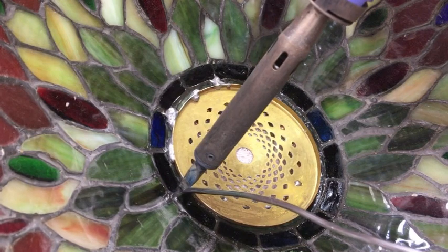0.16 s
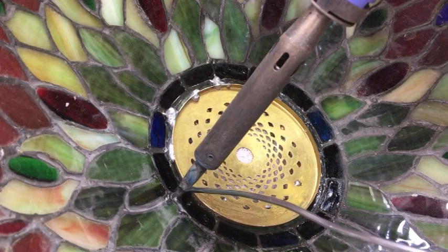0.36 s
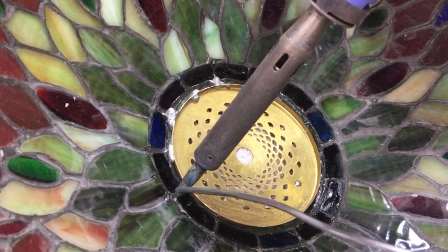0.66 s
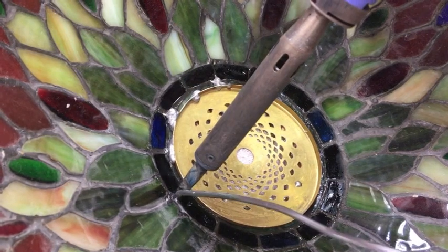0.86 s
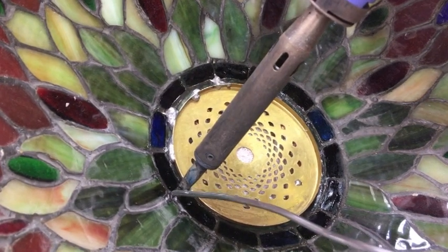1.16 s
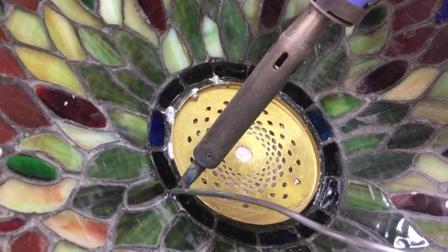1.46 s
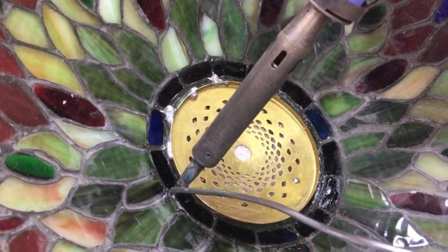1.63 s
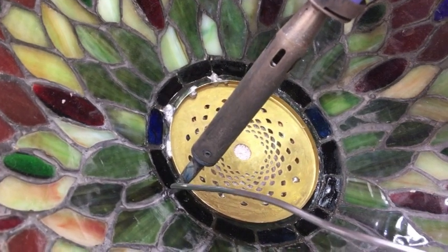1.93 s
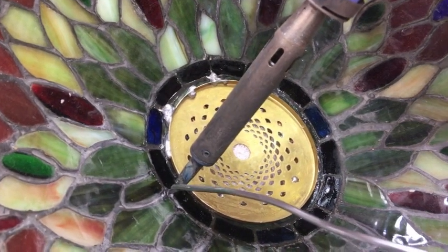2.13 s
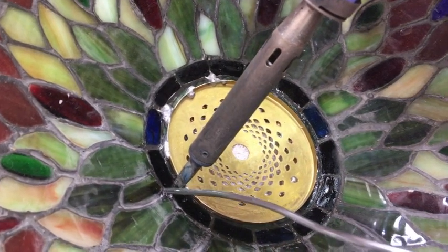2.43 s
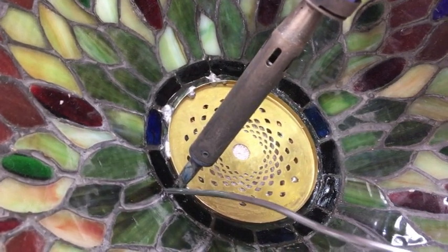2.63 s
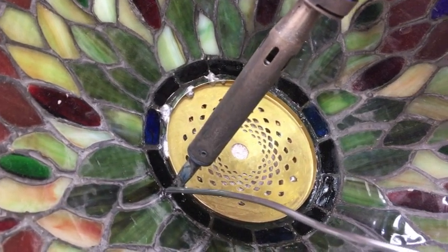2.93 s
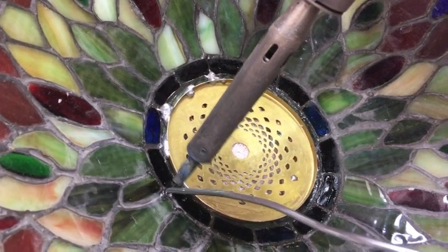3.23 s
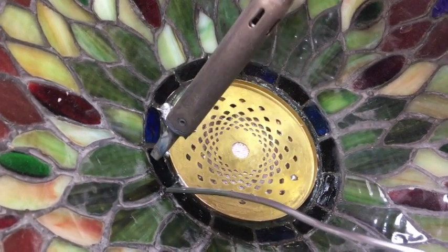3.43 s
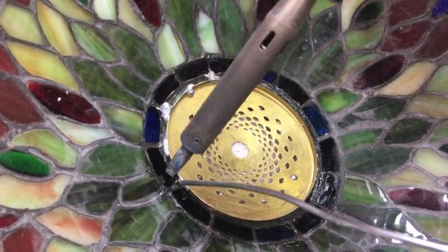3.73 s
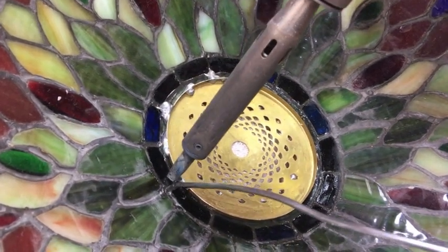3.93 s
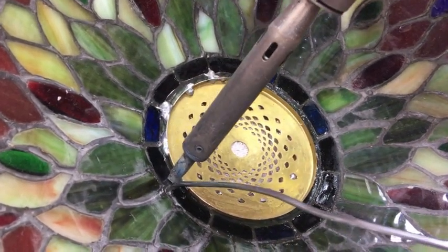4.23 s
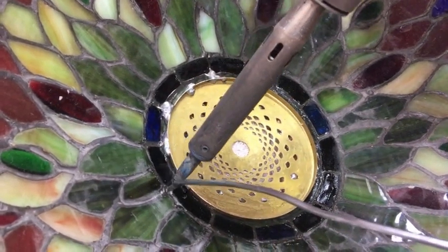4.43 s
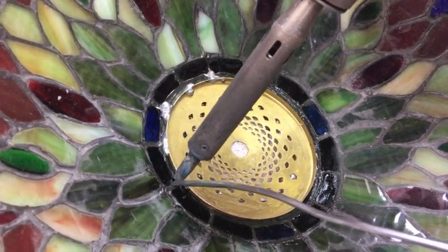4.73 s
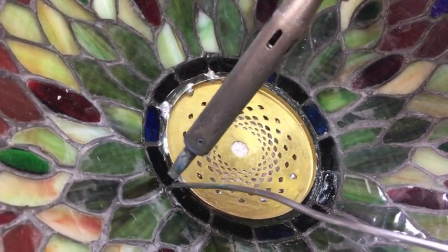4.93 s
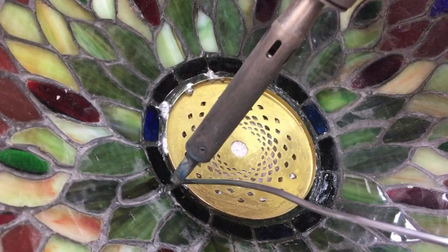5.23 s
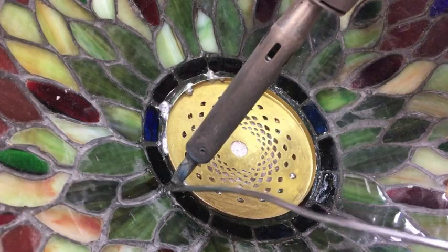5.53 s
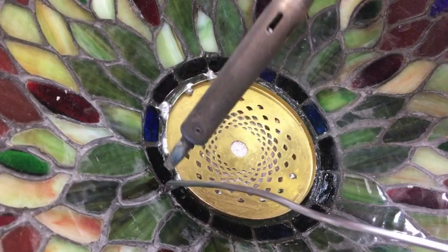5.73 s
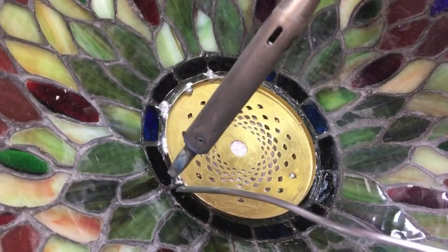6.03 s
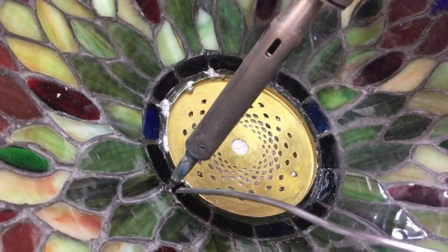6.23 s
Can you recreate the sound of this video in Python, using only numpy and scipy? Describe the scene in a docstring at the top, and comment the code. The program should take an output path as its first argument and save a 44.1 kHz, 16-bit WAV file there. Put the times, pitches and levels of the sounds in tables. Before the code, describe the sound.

Close up in a quiet, fairly dry workshop, a faint touch on glass leads into bright, dense flares of sizzling flux. They sink to a simmering crackle full of sharp spits, which fades after three seconds. One more short sizzle comes around four, then mostly hush, with knocks and tiny ticks of iron and wire on the shade. Low room rumble, faint hiss and a far engine continue throughout.

```python
"""Flux boils where a hot iron melts cored solder between a brass cap and a stained-glass shade.
First comes a soft knock, then bright flares of fizz: dense random noise bursts, coloured by resonances.
They thin to a crackle with sharp spits (clicks with noise tails), over a few dull band-passed thuds.
Later iron and wire knock and tick on the shade (filtered pulses, short rings) and the fizz nearly dries up.
Throughout, noise makes room rumble and hiss; a far engine, a few harmonics, slows and then picks up."""
import sys
import numpy as np
from scipy import signal
from scipy.fft import rfft, irfft
from scipy.io import wavfile
from scipy.ndimage import uniform_filter1d

SR = 44100
rng = np.random.default_rng(int(sys.argv[2]) if len(sys.argv) > 2 else 0)


def output_pcm(signal):
    """Save a mono or channel-first signal as 16-bit PCM at the path in sys.argv[1].

    Samples are clipped to [-1, 1] before scaling.
    """
    pcm = np.clip(np.atleast_2d(signal).T, -1, 1) * 32767
    wavfile.write(sys.argv[1], SR, np.round(pcm).astype(np.int16))


N = 281049

# Table levels are relative where a function adds its own trim.
# Flares of fizz and brief sputtering bursts: start_s, fizz_db, attack_s, hold_s, release_db_per_s
FLARES = [(0.208, -31, 0.004, 0.02, 250), (0.261, -30, 0.021, 0.092, 140), (0.343, -28.5, 0.052, 0.059, 87),
          (0.509, -31.5, 0.057, 0.12, 51), (1.102, -40.5, .03, 0.076, 130), (1.366, -38.5, 0.017, .04, 127),
          (1.62, -40.5, 0.019, 0.12, 150), (3.356, -47, 0.0068, 0.014, 350),
          (3.411, -47.5, .005, 0.014, 400), (3.86, -57, 0.017, 0.019, 175.5), (3.962, -63, .01, 0.019, 500),
          (4.028, -35, 0.044, 0.33, 126), (4.671, -63, .03, 0.08, 110), (5.331, -44.5, 0.0028, 0.29, 800),
          (6.27, -52.5, 0.0052, .1, 145)]
FLARE_SAG_DB_PER_S = 8  # from the onset; the release adds to it
# The pool at the opening, one row: time_s, fizz_db, bubble_ring_db
OPENING = (0.34, -41.5, -59.5)
# The pool simmers on between the flares: time_s, fizz_db, bubble_ring_db
SIMMER = [(0.76, -42.5, -52.5), (0.88, -42.5, -56.5), (1.16, -42.5, -55.5), (1.28, -45, -56),
          (1.57, -42.5, -56), (1.72, -45.5, -58.5), (1.98, -49, -59), (2.13, -47.5, -57),
          (2.35, -48.5, -56.5), (2.54, -47, -53), (2.7, -46, -57), (2.84, -47.5, -49), (2.98, -46, -53.5),
          (3.14, -51, -56.5), (3.3, -52, -62), (3.38, -57, -62.5), (3.51, -61, -72.5), (3.8, -69, -73.5)]
# The remnant of the pool: time_s, fizz_db, bubble_ring_db
LAST_SIMMER = [(4.46, -68, -77), (4.552, -59.5, -72.5), (4.774, -65.5, -69), (4.958, -71, -77.5),
               (5.128, -74, -81.5), (5.3, -78, -85)]
FRESH_FOR_S = 2.7  # the pool on the joint takes this long to become spent
DRY_AT_S, DRYING_DB_PER_S = 4.8, 3.5  # the remnant boils away
FLARE_RING_DB = -16.5  # bubble ring of a flare or burst, re its fizz
# Countless tiny bubbles of fresh flux, one row: bursts_per_s, lower_hiss_db (re fizz)
FRESH = (7400, -15.5)
# Fewer, larger bubbles of spent flux, one row: bursts_per_s, lower_hiss_db (re fizz)
SPENT = (480, -9)
# Colour of a bursting bubble: frequency_hz, level_db
FIZZ = [(400, -27), (800, -24), (1500, -21.5), (2600, -15.5), (4400, -20.5), (5500, -14), (6500, -23.5),
        (8200, -7), (10000, -12), (12000, -5.5), (14300, 0.5), (16000, -1)]
# Resonances of the cap, the glass and the gap under the iron: frequency_hz, boost_db
GAP = [(1620, 8.5), (2330, 8.5), (2900, 11.5), (3330, 9), (3750, 7.5), (4180, 12), (4600, 11), (5300, 8.5),
       (6380, 16.5), (7400, 17), (8850, 8), (9480, 13.5), (10100, 12), (10690, 10), (11280, 9.5),
       (11660, 7.5), (12030, -6), (12340, 11.5), (12740, 2.5), (13090, 0), (14150, 6), (14500, -1.5),
       (14900, 6.5)]
GAP_WIDTH_HZ = 153  # where the boost in dB has halved
# Ring of the larger bubbles: frequency_hz, level_db
BUBBLE = [(3000, -31), (5600, -14), (6200, 0.5), (6900, -1), (7450, 0), (8100, -10), (9000, -6.5),
          (10500, -13), (16000, -40.5)]
# The loudest spits of flux: start_s, crack_peak_db, sputter_db
SPITS = [(0.2039, -18, -26), (1.1358, -22, -32), (1.1852, -25, -35), (1.3379, -28, -37), (1.3678, -24, -35),
         (1.503, -24, -35), (1.5464, -26, -34), (1.5898, -25, -33), (1.722, -24, -32), (1.9355, -27, -37),
         (2.0004, -31, -40), (2.0288, -30, -38), (2.0971, -30, -40), (2.1774, -32, -39), (2.3311, -25, -41),
         (2.4309, -29, -39), (2.4997, -25, -39), (2.5925, -21, -35), (2.6873, -24, -39), (2.7926, -23, -37),
         (2.8145, -24, -40), (2.9143, -23, -39), (2.9846, -24, -37), (3.0435, -28, -43), (3.1253, -28, -40),
         (3.1587, -26, -39), (3.2475, -30, -43), (3.3019, -31, -42), (3.3643, -34, -42), (3.4181, -33, -45),
         (3.4805, -32, -43), (3.5124, -34, -45), (4.9092, -31, -43), (4.9521, -49, -59), (5.0095, -47, -58),
         (5.0744, -48, -59)]
SPIT_S, SPIT_RISE_S = .0027, .0005  # decay of a sharp spit and opening of any spit, time constants
SHARP_CREST_DB, SOFTER_DB_PER_DOUBLING = 12.5, 10  # a spit whose crack stands out less sputters longer
# Small spits fall at random; their crack is set re the simmer
SMALL_SPITS_PER_S, SMALL_SPIT_DB, SMALL_SPIT_S = 14, 7, .0025
SMALL_CREST_DB = 8.5  # a small spit's crack over its sputter, before trims
# Iron and wire knock on the shade: start_s, peak_db, lowest_hz, contact_cut_hz, scuff_s
KNOCKS = [(0.141, -54.5, 393, 1200, 0.006), (0.172, -53.5, 500, 1400, 0.0035),
          (3.286, -49.5, 550, 1410, 0.011), (3.764, -57, 1205, 1500, 0.0018),
          (4.056, -38, 279, 2200, 0.0071), (4.232, -50, 698, 1297, 0.015), (4.352, -46.5, 302, 1800, 0.037),
          (4.436, -31, 1400, 1760, 0.0019), (5.3342, -19, 109, 8900, .0001),
          (5.973, -56, 1200, 1518, 0.0016), (6.092, -56.5, 1600, 2070, 0.002),
          (6.279, -25, 99, 1670, 0.0001)]
# Response of the glass shade to a tap: frequency_hz, level_db
SHADE = [(60, -3.5), (170, 1.5), (250, -2.5), (355, 3.5), (470, -6), (600, -15.5), (760, -3), (1000, -15),
         (1220, -7.5), (1550, -22.5), (2100, -24), (2900, -20), (4500, -37.5), (9000, -23.5), (16000, -40)]
# Its longer ringing modes: frequency_hz, level_db, t60_s
SHADE_MODES = [(345, -44, 0.2), (710, -48, 0.092), (1264, -40, 0.039)]
# Light ticks of the solder wire: start_s, peak_db, pitch_hz
TICKS = [(5.189, -52.5, 2100), (5.19, -53, 4000), (5.748, -49, 5700), (2, -55, 3700)]
# Soft low bumps as the hand shifts: start_s, level_db
BUMPS = [(0.495, -46.5), (0.508, -56), (0.573, -55.5), (0.614, -54), (0.65, -51), (0.711, -50),
         (.73, -51.5), (0.78, -47.5), (.868, -47), (0.911, -50)]
START_HZ, IDLE_HZ, COAST_S = 52, 37.33, 1.17  # the engine's firing rate coasts down towards idle
PULL_AT_S, PULL_HZ_PER_S = 2.75, 8.8  # then rises evenly
# Loudness of the far engine: time_s, level_db
ENGINE_LEVEL = [(0, -54), (.7, -49.5), (1.2, -56.5), (2.4, -54), (2.8, -56.5), (4.0, -65.5), (5.2, -57.5),
                (6.37, -52)]
# Response of the walls and the room to it: frequency_hz, level_db
WALLS = [(40, -18), (50, -12), (60, 2), (70, -2.5), (79, -4), (86, -3.5), (95, 1), (104, 0), (122, -1.5),
         (136, -8), (180, 2.5), (220, -12)]
# Spectrum of the workshop rumble: frequency_hz, level_db
ROOM = [(15, -44), (25, -13.5), (40, -3), (62, 3), (95, -4.5), (130, -8), (210, -11), (300, -19),
        (420, -25.5), (700, -33.5), (1150, -29), (1500, -44), (3000, -68)]
# Spectrum of the faint hiss: frequency_hz, level_db
HISS = [(300, -18), (1200, -4), (2500, -4), (5000, -9), (10000, -7), (16000, -4.5)]
RUMBLE_DB, HISS_DB = -57, -70.5  # rms
CUTOFF_HZ = 15850


def flares():
    """Superposition of powers: each flare or burst swells, holds with a slight sag and dies away."""
    power = np.zeros(N)
    for s, db, attack, hold, release in FLARES:
        age = np.maximum(np.arange(N) / SR - s, 0)
        fall = FLARE_SAG_DB_PER_S * age + release * np.maximum(age - hold, 0)
        swell = np.minimum(age / attack, 1)
        power += (swell * from_db(db - fall)) ** 2
    return power


def boil(simmer_db=-0.5, ring_db=-1.0, spent_ring_db=2.0, surge_db=2.4, surges_per_s=25):
    """Power balance of pool and flares: levels of all fizz, pool, ring re fizz (dB); share spent (0-1)."""
    t = np.arange(N) / SR
    dried = np.minimum(t / FRESH_FOR_S, 1)
    swing = surge_db * drift(surges_per_s) - DRYING_DB_PER_S * np.maximum(t - DRY_AT_S, 0)
    main_pool, remnant = in_time([OPENING] + SIMMER), in_time(LAST_SIMMER)
    pool_db, pool_ring_db = np.where(t < LAST_SIMMER[0][0], main_pool, remnant) + swing

    pool = from_db(pool_db + simmer_db) ** 2
    flaring = flares()
    pool_rings = from_db(pool_ring_db + ring_db + spent_ring_db * dried) ** 2
    rings = pool_rings + flaring * from_db(FLARE_RING_DB) ** 2
    fizz = pool + flaring
    spent = dried * pool / fizz
    return 10 * np.log10(fizz), pool_db, 10 * np.log10(rings / fizz), spent


def bubbling(spent):
    """Bubble statistics: as flux is spent its bursts thin out and the lower hiss gains weight."""
    per_s = FRESH[0] * (SPENT[0] / FRESH[0]) ** spent
    lower_db = FRESH[1] + spent * (SPENT[1] - FRESH[1])
    return per_s, lower_db


def froth(per_s, spread_db, vent_s, vapour):
    """Shot noise: bubbles burst at random, each venting a tiny jet over a thin steady stream of vapour."""
    born = rng.random(N) < per_s / SR
    energy = born * from_db(spread_db * np.minimum(rng.exponential(1, N), 3.5)) ** 2
    jet_power = signal.lfilter([1], [1, -np.exp(-2 / (vent_s * SR))], energy)
    jets = np.sqrt(jet_power + 1e-12) * rng.standard_normal(N)
    return evened(jets, window_s=0.035) + np.sqrt(vapour) * rng.standard_normal(N)


def sizzle(level_db, per_s, lower_db, bubble_db, fizz_db=2.0, ring_db=2.0, large_share=.35, large_db=-4.5):
    """Filtered shot noise: tiny and large bursts give fizz and lower hiss; the large ones also ring."""
    tiny = froth(per_s, spread_db=3.5, vent_s=0.0007, vapour=0.04)
    large = froth(per_s * large_share, spread_db=3.0, vent_s=0.0011, vapour=0.3)
    spray = coloured(tiny + from_db(large_db) * large, FIZZ, GAP)
    high = butter(spray, 10100, "high", order=4)
    low = butter(spray, 6670, "low", order=6)
    fizz = from_db(fizz_db) * evened(high, window_s=0.11)
    hiss = from_db(lower_db) * evened(low, window_s=0.13)
    rings = from_db(bubble_db + ring_db) * evened(coloured(large, BUBBLE), window_s=0.048)
    return from_db(level_db) * (fizz + hiss + rings)


def spit_jet(peak_db, sputter_db, length_s, lumpy_db=3.5, lumps_per_s=1400):
    """Impulsive release: a pocket of flux cracks open, then sputters with a set amount of energy."""
    jet = puff(length_s)
    age = np.arange(len(jet)) / SR
    lumps = np.interp(age * lumps_per_s, np.arange(256), 2 * rng.random(256) - 1)
    jet = jet * (1 - np.exp(-age / SPIT_RISE_S)) * from_db(2 * lumpy_db * lumps)
    jet = jet * from_db(sputter_db) * np.sqrt(length_s * SR / 2 / np.sum(jet ** 2))
    jet[0] = from_db(peak_db)  # the crack is a single click
    return jet


def spits(pool_db, bubble_db, sputter_trim_db=5.0, crack_trim_db=8.5, bright_db=-5.0, ring_db=8.0):
    """Impulse excitation: the jets of loud and small spits sound in the gap and ring as bubbles do."""
    events = []
    for s, peak, sputter in SPITS:
        softness_db = SHARP_CREST_DB - (peak - sputter)
        events.append((s, peak, sputter, SPIT_S * 2 ** (softness_db / SOFTER_DB_PER_DOUBLING)))
    for i in rng.integers(0, N, int(SMALL_SPITS_PER_S * N / SR)):
        peak = pool_db[i] + SMALL_SPIT_DB
        events.append((i / SR, peak, peak - SMALL_CREST_DB, SMALL_SPIT_S))

    jets = np.zeros(N)
    for s, peak, sputter, length_s in events:
        add(jets, s, spit_jet(peak + crack_trim_db, sputter + sputter_trim_db, length_s))
    spray = coloured(jets, FIZZ, GAP)
    bright = from_db(bright_db) * butter(spray, 10000, "high", order=1)
    rings = from_db(ring_db + bubble_db) * coloured(jets, BUBBLE)
    return spray + bright + rings


def bending(x, lag_s=0.00456, corner_hz=420):
    """Dispersion of bending waves in a plate: the highs arrive first, the lows last."""
    hz = np.fft.rfftfreq(2 * len(x), 1 / SR)
    phase = 2 * np.pi * lag_s * corner_hz * np.log1p(hz / corner_hz)
    return irfft(rfft(x, 2 * len(x)) * np.exp(-1j * phase))[:len(x)]


def knocks(return_s=0.00557, return_db=-10.0, return_hz=1800, drag_db=-42, drag_s=0.037, drag_hz=800):
    """Impact and reflection: a touch sends a wave through the shade, back once from the rim; modes ring."""
    out = np.zeros(N)
    for s, db, low_hz, contact_hz, scuff_s in KNOCKS:
        push = puff(scuff_s) * (rng.random(4096) < .03) / 2  # sparse scuffing grains
        push[0] = 1  # the contact itself
        push = push + from_db(drag_db) * butter(puff(drag_s), drag_hz, "low")  # the tip drags as it settles
        push = butter(push, low_hz, "high", order=1)
        push = butter(push, min(contact_hz, 18000), "low", order=3)
        wave = bending(coloured(push, SHADE))
        add(wave, return_s, from_db(return_db) * butter(wave, return_hz, "low", order=1))
        modes = 0
        for hz, mode_db, t60_s in SHADE_MODES:
            modes = modes + ring(wave, hz, t60_s) * from_db(mode_db) * 2 * np.pi * hz / SR
        wave = wave + modes
        add(out, s, from_db(db) * wave / np.abs(wave).max())
    return out


def ticks(t60_s=0.00295):
    """Damped resonance: the wire grazes the metal and a noise puff excites a brief high ring."""
    out = np.zeros(N)
    for s, db, hz in TICKS:
        tick = ring(puff(0.0026), hz, t60_s)
        add(out, s, from_db(db) * tick / np.abs(tick).max())
    return out


def bumps(low_hz=165, high_hz=260, length_s=0.043, level_db=1.5):
    """Band-limited impact: decaying low noise makes the dull little thuds of handling."""
    out = np.zeros(N)
    for s, db in BUMPS:
        thud = butter(puff(length_s), [low_hz, high_hz], "band")
        add(out, s, from_db(db + level_db) * thud / np.abs(thud).max())
    return out


def workshop(x, wet_db, t60_s, size=16384):
    """Reverberation: convolution with exponentially decaying noise adds a faint short room tail."""
    tail = rng.standard_normal(size) * from_db(-60 * np.arange(size) / (SR * t60_s))
    tail[:SR // 250] = 0  # 4 ms before the first reflections
    tail = tail / np.sqrt(np.sum(tail ** 2))
    return x + from_db(wet_db) * signal.oaconvolve(x, tail)[:N]


def engine(waver_db=2.5, wobble_rad=0.12, third_db=-6.5):
    """Harmonic series through walls: three low orders of a far engine; uneven firing blurs the higher ones."""
    t = np.arange(N) / SR
    coast = (START_HZ - IDLE_HZ) * np.exp(-np.minimum(t, PULL_AT_S) / COAST_S)
    pull = PULL_HZ_PER_S * np.maximum(t - PULL_AT_S, 0)
    hz = IDLE_HZ + coast + pull
    phase = 2 * np.pi * np.cumsum(hz) / SR + wobble_rad * drift(36)
    level_db, = in_time(ENGINE_LEVEL)
    wall_hz, wall_db = np.transpose(WALLS)
    out = np.zeros(N)
    for order, order_db in enumerate((0, 0, third_db), 1):
        heard_db = level_db + order_db + np.interp(order * hz, wall_hz, wall_db) + waver_db * drift(23)
        out += np.sqrt(2) * from_db(heard_db) * np.sin(order * phase)
    return out


def background():
    """Stationary coloured noise: low room rumble under a faint even hiss."""
    rumble = rms_one(coloured(rng.standard_normal(N), ROOM))
    hiss = rms_one(coloured(rng.standard_normal(N), HISS))
    return from_db(RUMBLE_DB) * rumble + from_db(HISS_DB) * hiss


def from_db(db):
    """Logarithmic level law: decibels to amplitude gain."""
    return 10 ** (np.asarray(db) / 20)


def rms_one(x):
    """Mean-square normalization to unit rms."""
    return x / np.sqrt(np.mean(x ** 2) + 1e-20)


def evened(x, window_s):
    """Short-time power normalization: hold the slow level at 1 and keep the grain."""
    return x / np.sqrt(np.maximum(uniform_filter1d(x ** 2, int(window_s * SR)), 1e-12))


def in_time(rows):
    """Linear interpolation of each column of a curve at every sample."""
    s, *columns = np.transpose(rows)
    return [np.interp(np.arange(N) / SR, s, c) for c in columns]


def drift(rate_hz):
    """Slow random modulation: straight lines between random knots of spread 1."""
    knots = rng.standard_normal(2048)
    return np.interp(np.arange(N) / SR * rate_hz, np.arange(len(knots)), knots)


def butter(x, hz, kind, order=2):
    """Causal Butterworth filtering, maximally flat in its passband."""
    return signal.sosfilt(signal.butter(order, hz, kind, fs=SR, output="sos"), x + 1e-18)


def coloured(x, spectrum, peaks=(), size=8192):
    """Causal minimum-phase filtering by a smooth spectrum with narrow resonances on top."""
    hz = np.maximum(np.fft.rfftfreq(size, 1 / SR), 1)
    points_hz, levels_db = np.transpose(spectrum)
    db = np.interp(np.log(hz), np.log(points_hz), levels_db)
    for centre_hz, peak_db in peaks:
        db = db + peak_db / (1 + (2 * (hz - centre_hz) / GAP_WIDTH_HZ) ** 2)
    # folding the cepstrum onto positive time gives minimum phase
    cepstrum = irfft(np.log(from_db(db)))[:size // 2]
    cepstrum[0] /= 2
    response = irfft(np.exp(rfft(2 * cepstrum, size)))
    return signal.oaconvolve(x, response)[:N]


def ring(clicks, hz, t60_s):
    """Two-pole resonator: a unit click sets a decaying sine of height 1 ringing."""
    r = from_db(-60 / (t60_s * SR))
    w = 2 * np.pi * hz / SR
    return signal.lfilter([0, np.sin(w)], [1, -2 * r * np.cos(w), r * r], clicks + 1e-18)


def puff(length_s, size=4096):
    """Exponential decay: noise that starts at once and dies with the given time constant."""
    return rng.standard_normal(size) * np.exp(-np.arange(size) / (SR * max(length_s, 1 / SR)))


def add(out, s, sound):
    """Linear superposition of a sound from time s on."""
    i = max(round(s * SR), 0)
    out[i:i + len(sound)] += sound[:max(len(out) - i, 0)]


def scene():
    """Superposition of sources: the joint close by, the workshop behind."""
    level_db, pool_db, bubble_db, spent = boil()
    per_s, lower_db = bubbling(spent)
    boiling = sizzle(level_db, per_s, lower_db, bubble_db) + spits(pool_db, bubble_db)
    flux = workshop(boiling, wet_db=-23.0, t60_s=0.12)
    handling = workshop(knocks() + ticks() + bumps(), wet_db=-25.5, t60_s=0.59)
    behind = engine() + background()
    return (flux + handling + behind)[None]


def record(dry):
    """Band limitation: an elliptic low-pass cuts the top steeply."""
    return signal.sosfilt(signal.ellip(12, .2, 80, CUTOFF_HZ, fs=SR, output="sos"), dry)


dry = scene()
out = record(dry)
output_pcm(out)
```